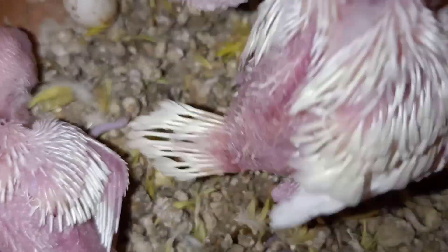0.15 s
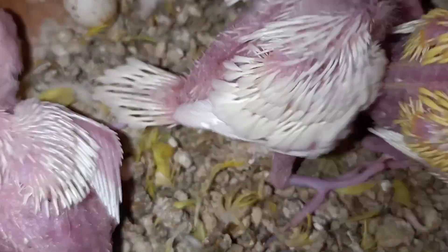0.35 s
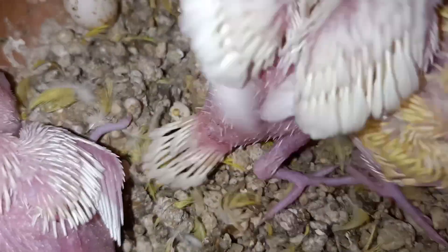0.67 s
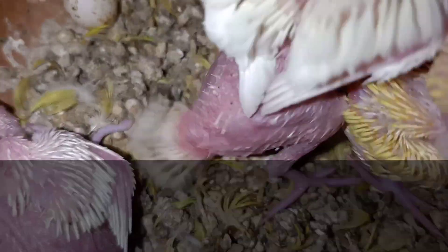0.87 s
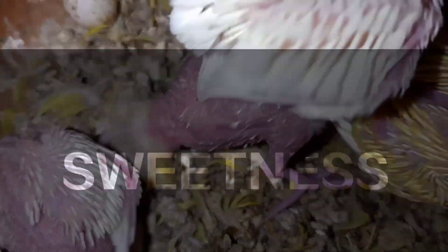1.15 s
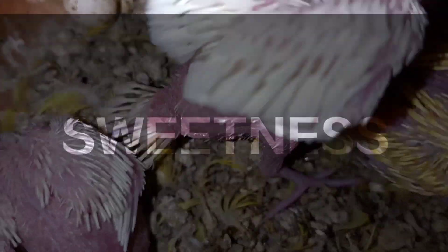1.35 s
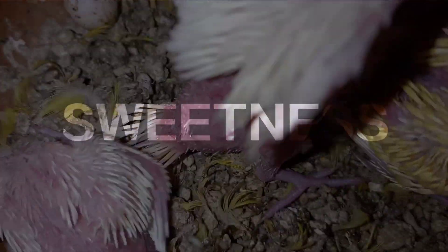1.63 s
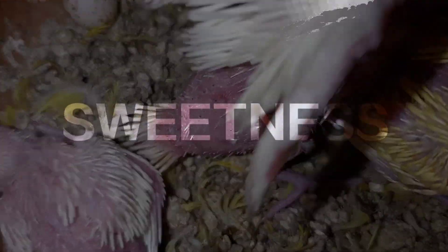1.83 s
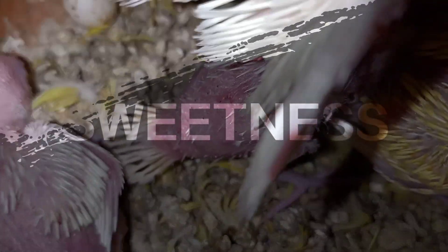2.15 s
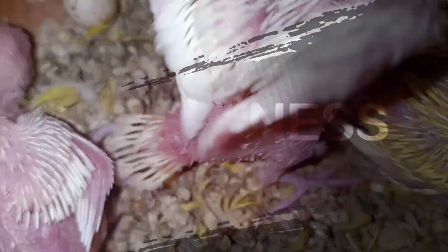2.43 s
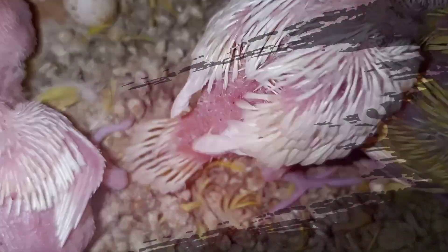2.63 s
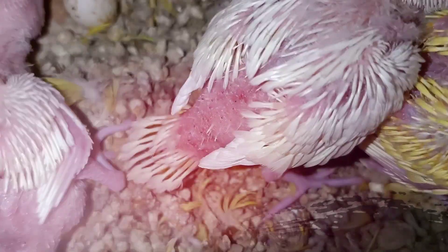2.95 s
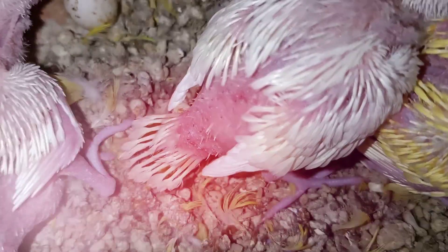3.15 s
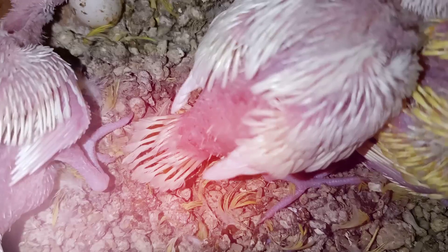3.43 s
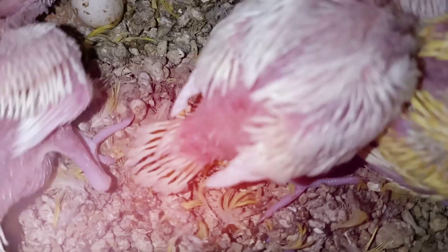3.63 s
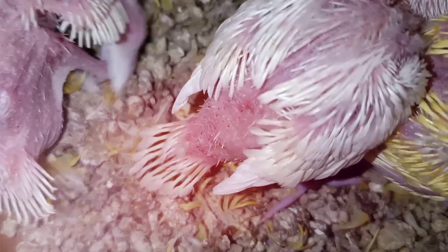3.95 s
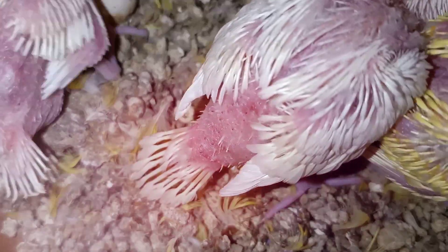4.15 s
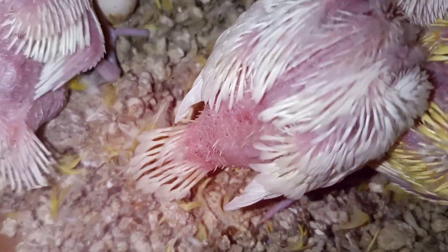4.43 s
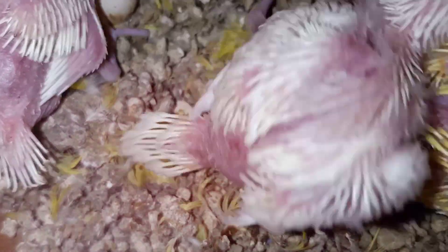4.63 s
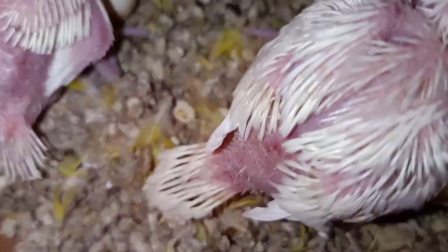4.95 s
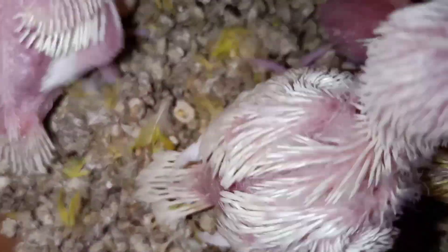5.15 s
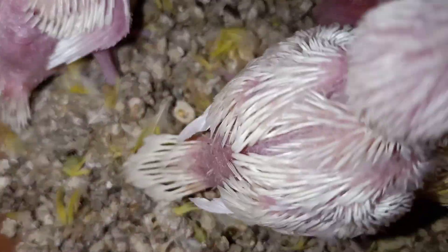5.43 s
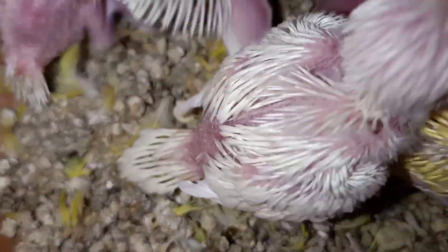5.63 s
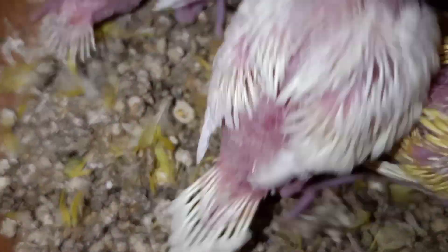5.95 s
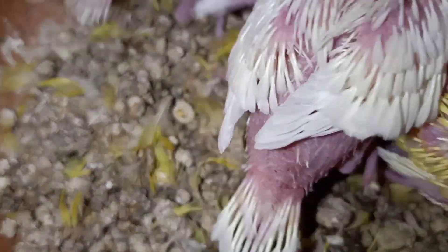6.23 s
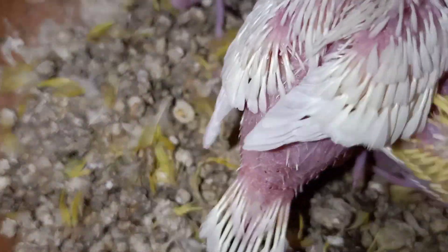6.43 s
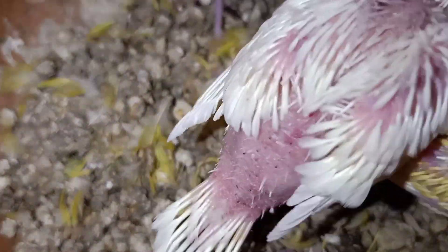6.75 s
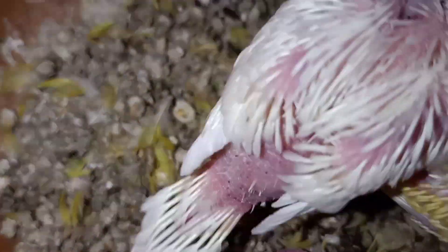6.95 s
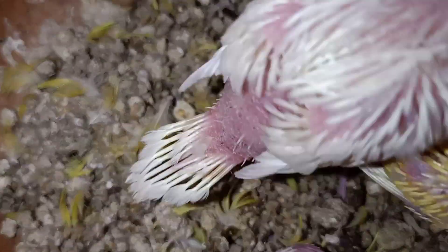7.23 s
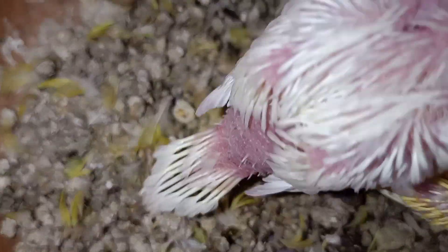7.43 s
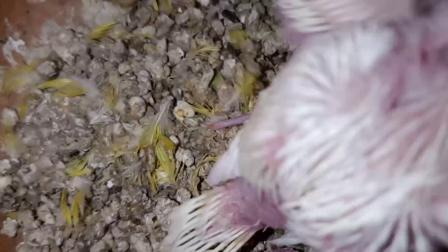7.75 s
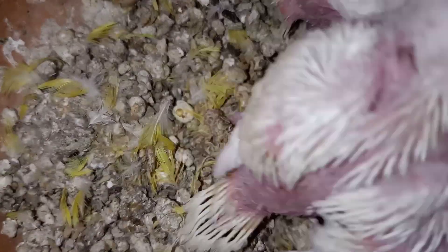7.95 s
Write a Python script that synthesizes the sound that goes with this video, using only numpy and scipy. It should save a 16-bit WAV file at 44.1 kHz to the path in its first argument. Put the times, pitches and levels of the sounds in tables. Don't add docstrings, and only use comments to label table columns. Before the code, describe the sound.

A brood of young parrots chatters raspily at close range, with sudden falling squawks, clear peeps and beak taps over a soft murmur of distant birds.

```python
import sys
import numpy as np
from scipy import signal
from scipy.fft import rfft, irfft
from scipy.io import wavfile
from scipy.ndimage import uniform_filter1d

SR = 44100
rng = np.random.default_rng(int(sys.argv[2]) if len(sys.argv) > 2 else 0)


def put_to_file(sound):
    columns = np.atleast_2d(sound).T
    safe = np.clip(columns, -1, 1)
    whole_steps = np.round(safe * 32767)
    wavfile.write(sys.argv[1], SR, whole_steps.astype(np.int16))


def invert_db(x):
    u = np.asarray(x, float) / 20
    return 10 ** u


N = 356328

# (full voice at [s], hold [s], level [dB], pitch [Hz])
LOW_CALLS = [(0.002, 0.061, -34.5, 2230.0), (0.08, 0.1813, -33.5, 2216), (0.385, 0.039, -28, 2250),
             (0.57, 0.043, -25.5, 2210.0), (0.796, 0.054, -40, 2210.0), (1.338, 0.017, -35.5, 2160.0),
             (1.45, 0.022, -35.5, 2008), (1.621, 0.015, -29.0, 2150.0), (1.91, 0.022, -31, 2204),
             (1.999, 0.22, -32.5, 2220.0), (2.194, 0.227, -32.5, 2230.0), (2.458, 0.017, -32.0, 2050),
             (2.864, 0.21, -30, 2134), (3.3, 0.0394, -38.0, 2138), (3.407, 0.1804, -34.0, 2289),
             (3.895, 0.04875, -34.0, 2219), (4.029, 0.0177, -38, 2292), (4.556, 0.099, -38, 2302),
             (4.68, 0.03, -27.5, 2250.0), (4.866, 0.022, -31.0, 2374), (5.021, 0.068, -36, 2230.0),
             (5.35, 0.0946, -30, 2327), (5.693, 0.0679, -28.5, 2088), (5.79, 0.0502, -36, 2050),
             (6.341, 0.099, -37.5, 2265), (6.542, 0.106, -29.5, 2290.0), (6.698, 0.38, -30, 2260.0),
             (7.432, 0.027, -31, 2280.0), (7.536, 0.111, -36, 2280), (7.71, 0.11, -33, 2144)]
MID_CALLS = [(0.087, 0.1403, -26, 2916), (0.355, 0.1158, -24, 3000.0), (0.553, 0.062, -15, 2900),
             (0.759, 0.17, -30.5, 2890), (1.22, 0.051, -39, 2951), (1.33, 0.051, -39, 2850),
             (1.46, 0.11, -33.5, 2890), (1.624, 0.22, -31, 2816), (2.034, 0.119, -31.0, 2810),
             (2.188, 0.194, -27.5, 3018), (2.433, 0.26, -29, 2770), (2.74, 0.15, -29, 3050),
             (2.91, 0.15, -30, 2540), (3.1, 0.071, -36, 2950), (3.36, 0.45, -30.5, 2867),
             (3.443, 0.068, -24.5, 3000), (3.838, 0.11, -32, 2773), (4.036, 0.026, -28.5, 2640.0),
             (4.28, 0.026, -29, 2904), (4.585, 0.27, -27.0, 2841), (5.055, 0.16, -28.5, 2774),
             (5.345, 0.09, -18.5, 2924), (5.47, 0.15, -34.0, 3016), (5.727, 0.0678, -31, 2725),
             (6.016, 0.17, -31.5, 2897), (6.273, 0.37, -28.5, 2883), (6.608, 0.044, -24.5, 2720),
             (6.747, 0.048, -24.5, 2694), (6.886, 0.17, -25.5, 3018), (7.1, 0.11, -34, 2820),
             (7.392, 0.14, -27.5, 3020.0), (7.58, 0.174, -26, 2905), (7.758, 0.047, -21, 2886),
             (8.041, 0.36, -30, 2935)]
HIGH_CALLS = [(0.12, 0.25, -39.5, 3700), (0.561, 0.0347, -26.0, 3900.0), (0.73, 0.2125, -36.5, 3677),
              (1.334, 0.02228, -33.5, 4136), (1.452, 0.02072, -37, 3656), (1.647, 0.01792, -37.5, 4220),
              (1.73, 0.054, -37.5, 3704), (1.926, 0.06, -36.5, 4250), (2.02, 0.12, -39, 3580),
              (2.294, 0.055, -33.5, 3430), (2.464, 0.0218, -37.0, 3700.0), (2.71, 0.158, -34, 3824),
              (3.242, 0.129, -31.5, 3606), (3.463, 0.042, -30.5, 3700), (3.665, 0.0342, -42, 3626),
              (3.843, 0.046, -38.5, 3930), (4.279, 0.0638, -35, 3566), (4.637, 0.095, -29.5, 3636),
              (4.87, 0.0152, -26, 4170), (5.051, 0.1844, -39.5, 3685), (5.353, 0.0249, -25.5, 3594),
              (5.369, 0.157, -32.5, 3790.0), (5.692, 0.089, -33.5, 3798), (6.02, 0.093, -39.5, 3592),
              (6.313, 0.016, -32.0, 3790.0), (6.427, 0.237, -34.5, 3610), (6.822, 0.215, -36, 3620.0),
              (7.199, 0.15, -41.5, 3971), (7.469, 0.08, -28, 3670), (7.701, 0.087, -26, 3731),
              (8.022, 0.061, -39.5, 3860)]
# (time [s], level [dB], share of the pitch fall [0-1])
SQUAWKS = [
    (0.479, -19, .7),
    (5.271, -18.5, 1.1),
    (7.648, -18.5, 1.05),
]
# (time after onset [s], level [dB], pitch [Hz])
SQUAWK_SHAPE = [
    (-.03, -80, 4910),
    (-.012, -27, 4902),
    (-.004, -8, 4862),
    (.001, -2.5, 4737),
    (.016, 4.5, 4400),
    (.05, -1, 4100),
    (.08, -6, 3685),
    (.1, -77, 3490),
]
# (time [s], length [s], level [dB], first pitch [Hz], last pitch [Hz])
PEEPS = [(0.146, 0.099, -28, 2524, 2520), (0.343, 0.083, -20.5, 3143, 3000),
         (0.422, 0.074, -21.5, 3060, 3000), (0.478, 0.035, -19, 4700, 4770), (0.482, 0.06, -19, 4350, 4190),
         (0.543, 0.105, -16, 3136, 2920), (0.575, 0.064, -20.5, 2550, 2450),
         (1.25, 0.157, -32.5, 2150, 2114), (1.436, 0.067, -35, 2020, 1930),
         (1.504, 0.035, -32.5, 2950, 2830), (1.586, 0.065, -28.5, 2180, 2235),
         (1.881, 0.056, -27, 2232, 2140), (2.015, 0.044, -35.5, 3500, 3460), (2.076, 0.05, -33, 4600, 4720),
         (2.167, 0.079, -27, 2460, 2480), (2.297, 0.051, -28, 3350, 3380), (2.442, 0.09, -25, 2560, 2710),
         (2.573, 0.13, -30, 3050, 3255), (2.764, 0.085, -30.5, 3050, 3070),
         (2.841, 0.084, -26.5, 2044, 2124), (2.885, 0.16, -21.5, 2520, 2450), (3.04, 0.14, -32, 2487, 3100),
         (3.188, 0.2, -35.5, 3646, 3740), (3.433, 0.057, -40, 4920, 4840), (3.8, 0.062, -37.5, 4200, 4100),
         (4.83, 0.152, -30.5, 2552, 2450), (5.268, 0.06, -20.5, 4447, 3915),
         (5.325, 0.105, -21, 3000, 2900), (5.431, 0.029, -25, 2900, 2916), (5.362, 0.039, -20, 2384, 2460),
         (5.65, 0.0903, -27.5, 1926, 1970), (6.27, 0.14, -32, 3157, 3173), (6.52, 0.12, -31, 2437, 2502),
         (6.666, 0.091, -28.5, 2373, 2440), (6.933, 0.084, -22, 3200, 3120), (7.54, 0.1, -27, 2940, 3060),
         (7.652, 0.06, -21.5, 4463, 4170), (7.789, 0.122, -37, 2060, 1936)]
# (full voice at [s], hold [s], level [dB])
RASP_CALLS = [(0.055, 0.156, -39), (0.301, 0.15, -41.5), (0.5, 0.128, -31.5), (0.755, 0.166, -39),
              (1.04, 0.12, -37), (1.16, 0.015, -34), (1.612, 0.034, -38), (1.924, 0.101, -44),
              (2.084, 0.08, -40.5), (2.254, 0.093, -37.5), (2.436, 0.069, -35.5), (2.719, 0.22, -40),
              (3.906, 0.062, -34), (4.038, 0.018, -39), (4.225, 0.04, -33.5), (4.494, 0.056, -37),
              (4.638, 0.09, -30), (4.812, 0.11, -30.5), (5.177, 0.204, -31.5), (5.686, 0.05, -41),
              (5.999, 0.062, -37.5), (6.284, 0.029, -26.5), (6.599, 0.17, -36), (6.925, 0.05, -33),
              (7.181, 0.022, -41.5), (7.278, 0.028, -37.5), (7.44, 0.014, -32), (7.51, 0.11, -40),
              (7.641, 0.17, -33.5), (8.057, 0.035, -35.5)]
# (swell [dB/s], sag while held [dB/s], fade [dB/s], mutter between calls [dB])
LOW_BREATH = (280, 25, 112, -40.5)
MID_BREATH = (328.5, 4, 150, -43.5)
HIGH_BREATH = (141.5, 14, 209, -59.5)
RASP_BREATH = (449.5, 29, 254, -47)
# (time [s], level over the mutter [dB])
GRUMBLE = [
    (0, 1.5),
    (2.9, 1.5),
    (2.97, -4.5),
    (3.35, -1),
    (3.85, 1),
    (4.4, -6),
    (5.45, 4.5),
    (5.9, -3),
    (8.08, 0.5),
]
# (frequency [Hz], width [Hz], level [dB])
RASP_THROAT = [(3000, 1300, 3), (4200, 1200, -5.5), (4690, 1700, 0), (6220, 910, -3), (7000, 780, -9),
               (9920, 610, 4)]
# (time [s], peak level [dB], frequency [Hz])
BEAK_TAPS = [
    (.3485, -25, 3300),
    (.4785, -16, 4900),
    (4.285, -20, 3120),
    (4.2848, -30, 1032),
    (5.2713, -13, 4800),
    (5.3248, -10.5, 3820),
    (5.3247, -12, 2060),
    (5.325, -10, 2900),
    (5.3246, -25, 1500),
]
# (time [s], level [dB], pitch [Hz])
FAR_COO = [
    (2.8, -65, 1000),
    (2.88, -45, 1020),
    (3.0, -42, 1030),
    (3.15, -44, 1000),
    (3.28, -65, 960),
]
# (time [s], level [dB])
ROOM_AIR = [(0.0, -43.5), (1.03, -43.5), (1.26, -45), (2.86, -42), (2.99, -40), (3.22, -41.5),
            (4.12, -44.5), (4.91, -40), (5.22, -43), (5.85, -44), (6.23, -44.5), (6.53, -41.5),
            (7.67, -40.5), (8.08, -40)]
# (frequency [Hz], level per Hz [dB])
MURMUR = [(40, -32.5), (96, -18.5), (400, -2), (1570, -1.5), (2150, -2.5), (4550, -11), (6230, -55.5),
          (9620, -37.5)]
# (frequency [Hz], likeness [0-1])
LIKENESS = [(60, 0.37), (210, 0.29), (740, 0.83), (2610, 0.038), (9170, 0.28)]
# (frequency [Hz], level [dB])
HUM = [(50, -82.5), (100, -75.5), (150, -68), (250, -60)]
# (frequency [Hz], left minus right [dB])
LEFT_LEAD = [(60, 5), (210, 2.5), (740, 1), (2610, 3), (9170, 5.0)]

BOX_T60_S, BOX_DB = 0.03, 0.5
NEAR_BOX_DB = -5
BOX_LAG_S = 0.00998
BREAK_DB, BREAK_S = 5.0, 0.0069
PUFFS_PER_S, PUFF_FLOOR = 330, .18
THROAT_HZ, OCTAVE_BEST_DB, OCTAVE_LOSS_DB, OCTAVE_LEAST_DB = 4350, -4, 117, -33.5


def hoarse_whistle(track, hoarse, flutter_hz, shake_hz, neighbour_db, spread_hz):
    level_db, pitch_hz = in_time(track)
    turn, throb = fluttering(pitch_hz, flutter_hz, hoarse * shake_hz, throb_db=0.5)
    centre = 2 * np.pi * np.cumsum(pitch_hz) / SR
    beat = np.cumsum(PUFFS_PER_S * (1 + .3 * wander(60.1))) / SR
    puffs = PUFF_FLOOR + np.sin(np.pi * beat) ** 2
    along, across = uniform_filter1d([wander(spread_hz), wander(spread_hz)], size=22)
    crowd = rms_one(puffs * (along * np.sin(centre) + across * np.cos(centre)))
    both = throb * np.sin(turn) + invert_db(neighbour_db) * crowd
    own_level = np.sqrt(uniform_filter1d(both ** 2, size=2400))
    return invert_db(level_db) * both / own_level


def fluttering(pitch_hz, flutter_hz, shake_hz, throb_db):
    flutter = np.sin(2 * np.pi * np.cumsum(flutter_hz * (1 + .3 * wander(25))) / SR)
    hz = pitch_hz + shake_hz * (0.632 * flutter + 2 * np.tanh(wander(350.8) / 2))
    gain = invert_db(throb_db * (flutter + 1.08 * wander(60)))
    return 2 * np.pi * np.cumsum(hz) / SR, gain


def call_track(calls, breath, squawks=()):
    t, power = effort(calls, breath)
    pull = np.array(calls)[:, 3] @ power
    total = power.sum(axis=0)
    after, shape_db, shape_hz = np.transpose(SQUAWK_SHAPE)
    for s, db, fall in squawks:
        head = invert_db(2 * (db + np.interp(t - s, after, shape_db)))
        falling_hz = shape_hz[0] + fall * (shape_hz - shape_hz[0])
        pull = pull + 4.0 * head * np.interp(t - s, after, falling_hz)
        power = np.vstack([power, 4.0 * head])
        total = total + head
    level_db = 10 * np.log10(total + invert_db(2 * breath[3]))
    return np.transpose([t, level_db, pull / power.sum(axis=0)])


def effort(calls, breath):
    swell_db, sag_db, fade_db, _ = breath
    t = np.arange(0, N / SR + .002, .002)
    s, hold, level_db = np.array(calls).T[:3, :, None]
    since = t - s + BOX_LAG_S
    lost_db = swell_db * np.maximum(-since, 0)
    lost_db = lost_db + sag_db * np.clip(since, 0, hold)
    lost_db = lost_db + fade_db * np.maximum(since - hold, 0)
    lost_db = lost_db + BREAK_DB * np.clip((since - hold) / BREAK_S, 0, 1)
    return t, invert_db(2 * (level_db - lost_db)) + 1e-30


def turn_taking(low_hz, high_hz):
    gain = np.ones(N)
    for s, length, _, first_hz, _ in PEEPS:
        octave_inside = octave_db(first_hz) > -10 and low_hz < 2 * first_hz < high_hz
        if low_hz < first_hz < high_hz or octave_inside:
            at, _, loudness = peep_swell(s, length)
            gain[at] *= invert_db(-5 * loudness)
    return gain


def clear_peeps():
    out = np.zeros(N)
    shake, throb = fluttering(0, flutter_hz=110, shake_hz=58, throb_db=2.5)
    for s, length, level_db, first_hz, last_hz in PEEPS:
        at, part, loudness = peep_swell(s, length)
        turn = 2 * np.pi * np.cumsum(first_hz + (last_hz - first_hz) * part) / SR
        turn += shake[at] * (first_hz / 2000) ** 1.5
        tone = np.sin(turn) + invert_db(octave_db(first_hz)) * np.sin(2 * turn)
        out[at] += invert_db(level_db + 0.5) * loudness * throb[at] * tone
    return out


def peep_swell(s, length):
    at = slice(round(s * SR), round((s + length) * SR))
    part = np.linspace(0, 1, at.stop - at.start)
    return at, part, np.sin(np.pi * part ** .62) ** .5


def octave_db(hz):
    away = abs(np.log2(2 * hz / THROAT_HZ))
    return max(OCTAVE_BEST_DB - OCTAVE_LOSS_DB * away, OCTAVE_LEAST_DB)


def rasp():
    turns = np.cumsum(290 * (1 + .35 * wander(70))) / SR
    puffs = np.exp(-3.0 * (turns % 1)) * invert_db(1.0 * wander(120))
    source = rng.standard_normal(N) * (0.23 + puffs)
    voiced = np.zeros(N)
    for k, (hz, width_hz, db) in enumerate(RASP_THROAT):
        peak = resonance(resonance(source, hz, width_hz), hz, width_hz)
        voiced += (-1) ** k * invert_db(db) * peak
    t, power = effort(RASP_CALLS, RASP_BREATH)
    grumble_db = RASP_BREATH[3] + np.interp(t, *np.transpose(GRUMBLE))
    loudness = np.sqrt(power.sum(axis=0) + invert_db(2 * grumble_db))
    return np.interp(np.arange(N) / SR, t, loudness) * rms_one(voiced)


def breath_noise(voices):
    loudness = np.sqrt(uniform_filter1d(voices ** 2, size=900) + 1e-12)
    hiss = resonance(resonance(rng.standard_normal(N), 1550, 970), 1550, 970)
    return invert_db(-22) * loudness * rms_one(hiss)


def beak_taps():
    out = np.zeros(N)
    t = np.arange(-1500, 1500) / SR
    for s, peak_db, hz in BEAK_TAPS:
        at = round(s * SR)
        push = np.sin(2 * np.pi * hz * t) * np.exp(-(t * hz / 3.0) ** 2)
        out[at - 1500:at + 1500] += invert_db(peak_db) * push
    return out


def nest_box(x, wet_db=BOX_DB):
    t = np.arange(SR // 4) / SR
    tail = rng.standard_normal((2, 2, len(t))) * invert_db(-60 * t / BOX_T60_S) * (t > .0005)
    tail /= np.sqrt(np.sum(tail ** 2, axis=2, keepdims=True))
    spot = 1.71 * wander(3)
    shares = np.array([np.cos(spot), np.sin(spot)])[:, None] * x
    wet = invert_db(wet_db) * signal.oaconvolve(shares, tail, axes=2).sum(axis=0)[:, :N]
    return (x + wet) / np.sqrt(1 + invert_db(2 * wet_db))


def far_murmur():
    out, edges = 0, 34 * 2 ** np.arange(0, 9, .5)
    white = rng.standard_normal((2, 2, N))
    for k, (low, high) in enumerate(zip(edges, edges[1:])):
        band = signal.butter(2, [low, high], "band", fs=SR, output="sos")
        mid, side = signal.sosfilt(band, white[k % 2])
        hz = np.sqrt(low * high)
        alike = np.clip(at_hz(LIKENESS, hz), 0, 1)
        gain = invert_db(at_hz(MURMUR, hz) + 0.13 * wander(1.9))
        out = out + gain * (np.sqrt(1 + alike) * mid + np.sqrt(1 - alike) * side * [[1], [-1]])
    return invert_db(in_time(ROOM_AIR)[0] + 4.5) * rms_one(out)


def mains_hum():
    t = np.arange(N) / SR
    return sum(invert_db(db + 1.7 * wander(4.8)) * np.sin(2 * np.pi * hz * t) for hz, db in HUM)


def rms_one(x):
    return x / np.sqrt(np.mean(x ** 2, axis=-1, keepdims=True) + 1e-20)


def in_time(rows):
    s, *columns = np.transpose(rows)
    return [np.interp(np.arange(N) / SR, s, c) for c in columns]


def at_hz(points, hz):
    point_hz, value = np.transpose(points)
    return np.interp(np.log(hz), np.log(point_hz), value)


def wander(rate_hz):
    step = max(4, int(SR / rate_hz) // 30)
    r = np.exp(-2 * np.pi * rate_hz * step / SR)
    noise = rng.standard_normal(N // 4 + 400)[:N // step + 400]
    slow = signal.lfilter([1], [1, -2 * r, r * r], noise)[300:]
    return np.interp(np.arange(N) / step, np.arange(len(slow)), rms_one(slow))


def resonance(x, hz, width_hz):
    r = np.exp(-np.pi * width_hz / SR)
    top = np.array([1, 0, -1]) * (1 - r * r) / 2
    return signal.lfilter(top, [1, -2 * r * np.cos(2 * np.pi * hz / SR), r * r], x)


def scene():
    low = hoarse_whistle(call_track(LOW_CALLS, LOW_BREATH), hoarse=0.7,
                         flutter_hz=118.5, shake_hz=230.5, neighbour_db=2.0, spread_hz=330)
    mid = hoarse_whistle(call_track(MID_CALLS, MID_BREATH), hoarse=0.69,
                         flutter_hz=229.1, shake_hz=357.3, neighbour_db=2.5, spread_hz=506)
    high = hoarse_whistle(call_track(HIGH_CALLS, HIGH_BREATH, SQUAWKS), hoarse=0.55,
                          flutter_hz=298.7, shake_hz=399.5, neighbour_db=2.5, spread_hz=520)
    coo = hoarse_whistle(FAR_COO, hoarse=.7,
                         flutter_hz=90.6, shake_hz=211.7, neighbour_db=-1.5, spread_hz=250)
    low = low * turn_taking(0, 2450)
    mid = mid * turn_taking(2450, 3450)
    high = high * turn_taking(3450, 5300)
    near = nest_box(low + high + coo + mid + breath_noise(mid))
    near = near + nest_box(rasp()) + nest_box(clear_peeps(), NEAR_BOX_DB)
    near = signal.sosfilt(signal.butter(2, 500, "high", fs=SR, output="sos"), near)
    taps = beak_taps() * invert_db(np.array([[1.5], [-4]]))
    return near + taps + far_murmur() + mains_hum()


def low_pass(x):
    return signal.sosfilt(signal.butter(12, 9770, fs=SR, output="sos"), x)


def record(dry):
    lead_db = at_hz(LEFT_LEAD, np.maximum(np.arange(N // 2 + 1) * SR / N, 1))
    tilted = irfft(rfft(dry) * invert_db(np.outer([.5, -.5], lead_db)), N)
    notched = tilted - 0.63 * resonance(tilted, 8070, 900)
    held = notched / (1 + (notched / .98) ** 10) ** .1
    cut = signal.sosfilt(signal.cheby2(12, 60, 9950, fs=SR, output="sos"), held)
    mix = cut + 0.0015
    return low_pass(mix)


dry = scene()
out = record(dry)
put_to_file(out)
```